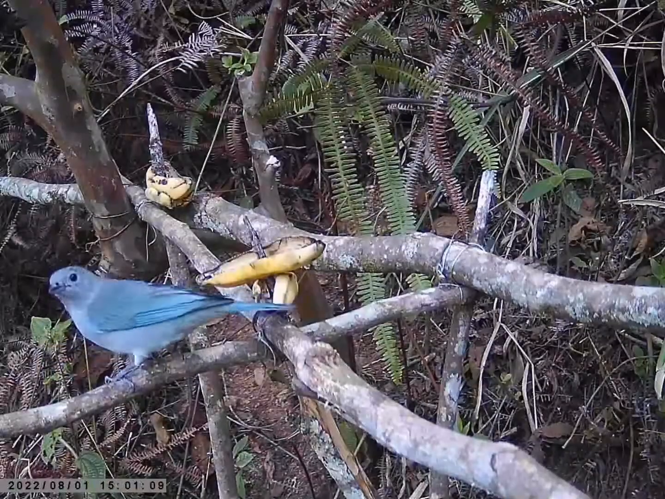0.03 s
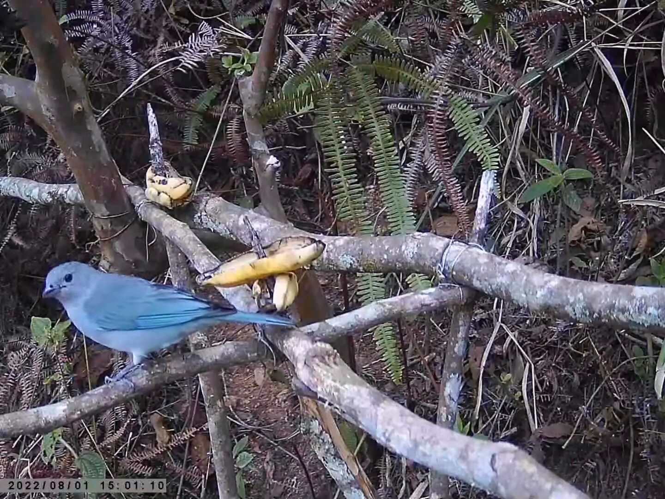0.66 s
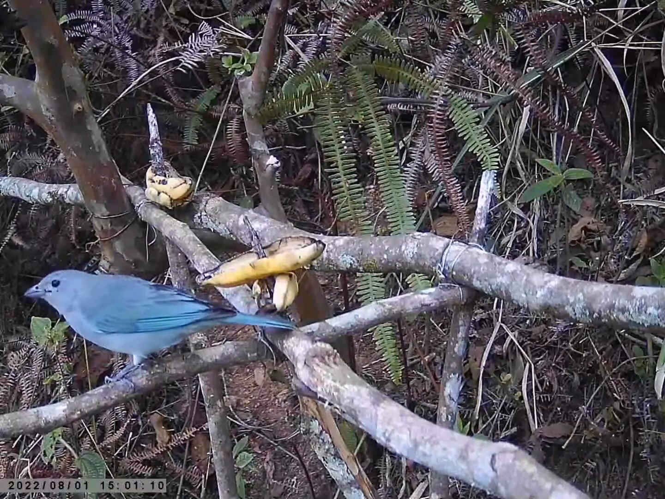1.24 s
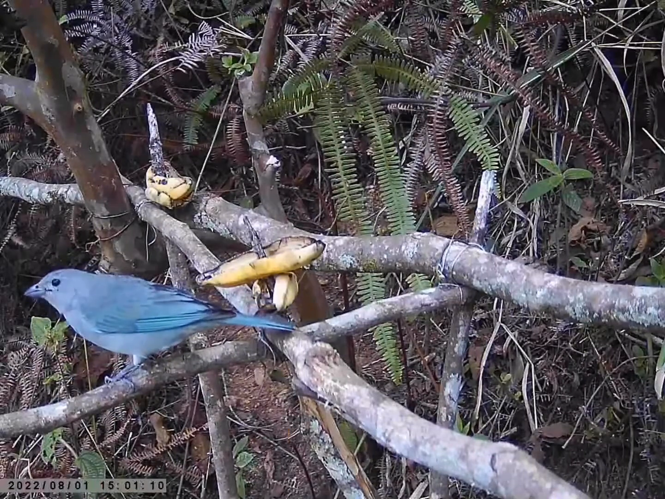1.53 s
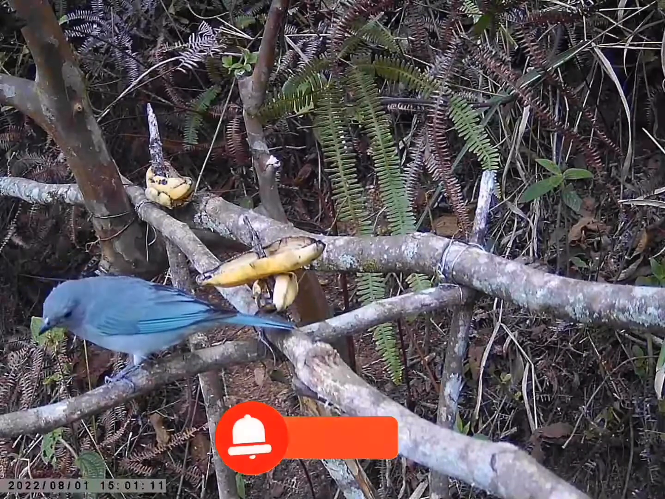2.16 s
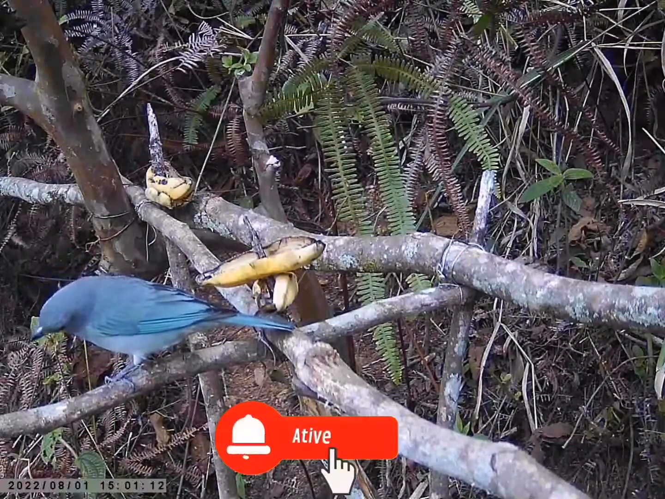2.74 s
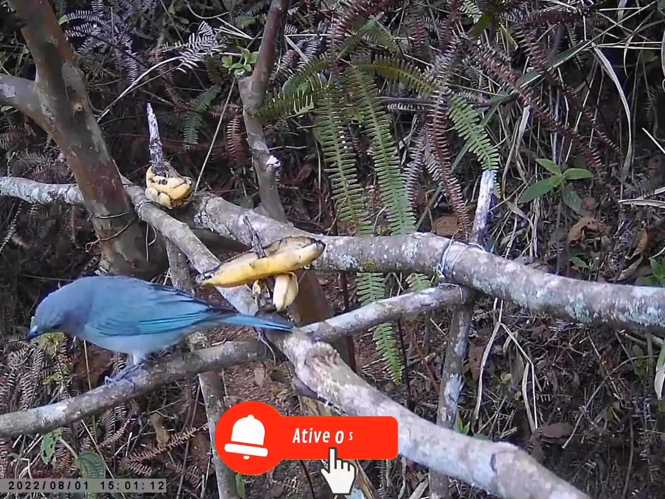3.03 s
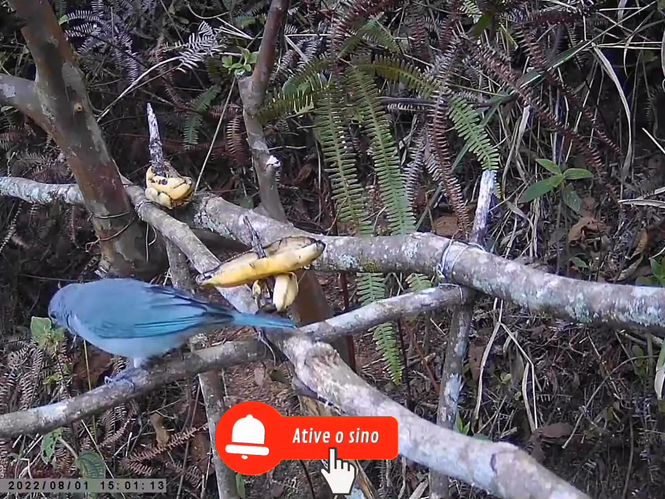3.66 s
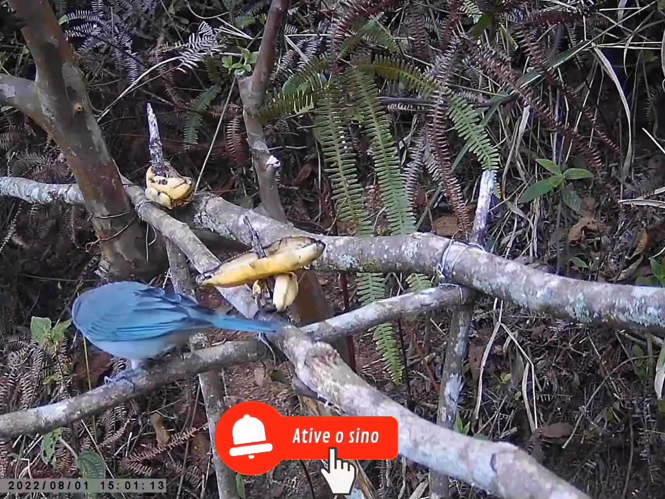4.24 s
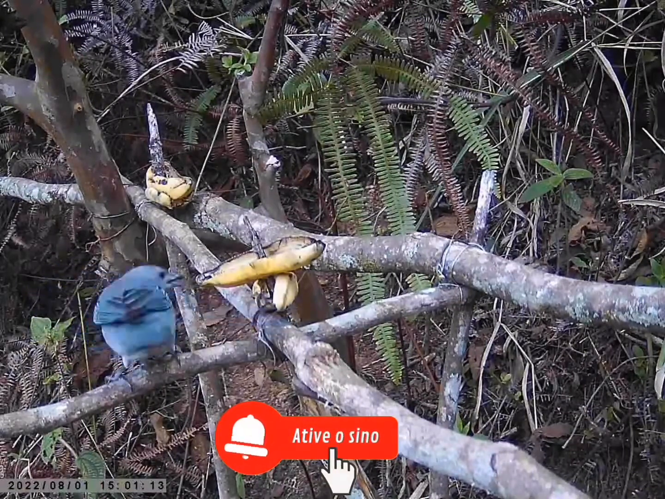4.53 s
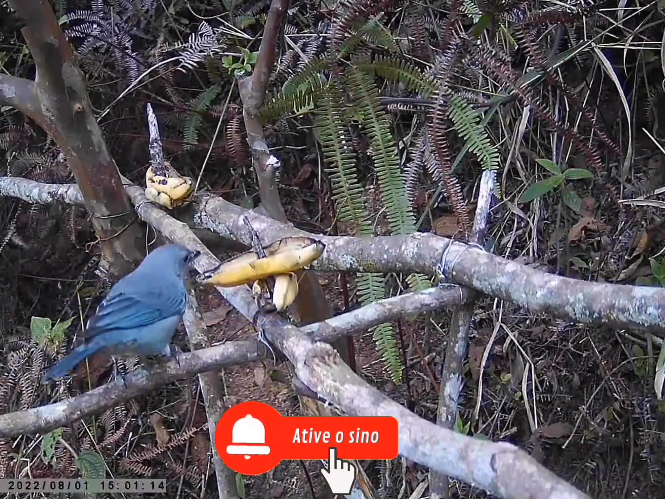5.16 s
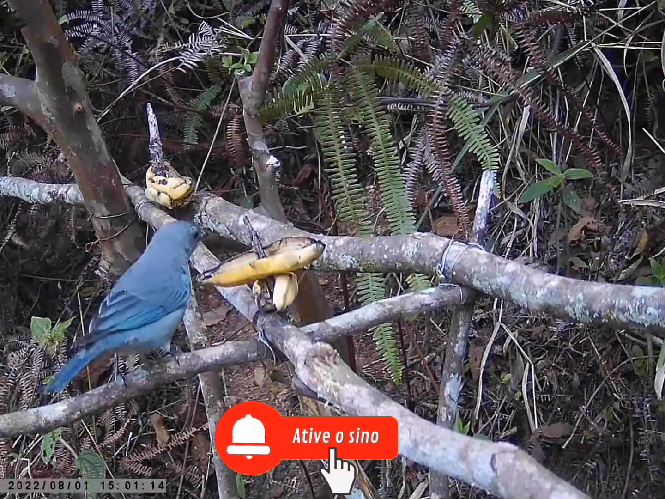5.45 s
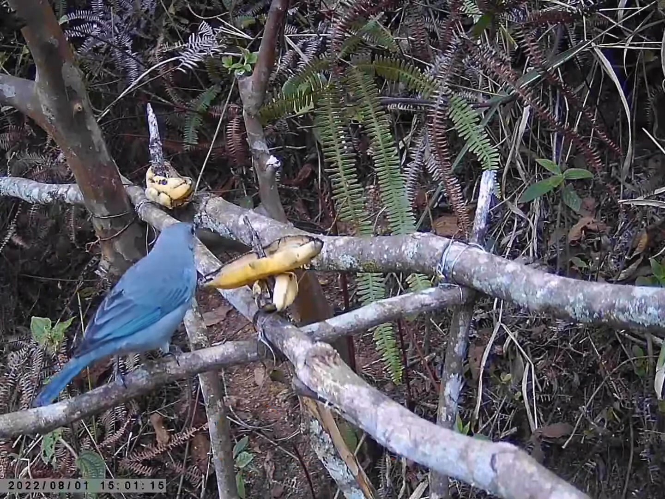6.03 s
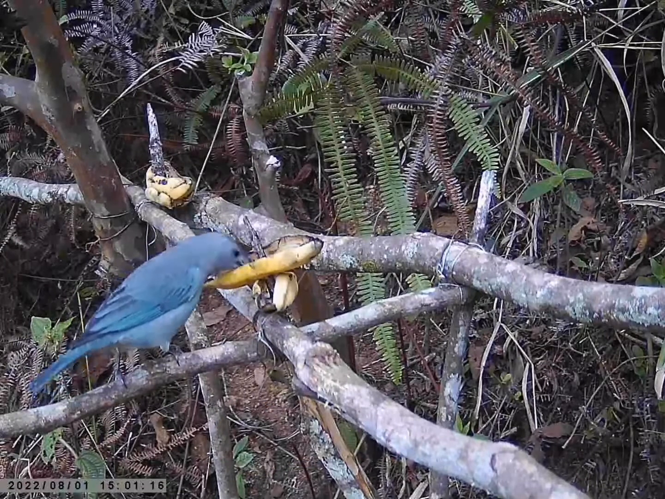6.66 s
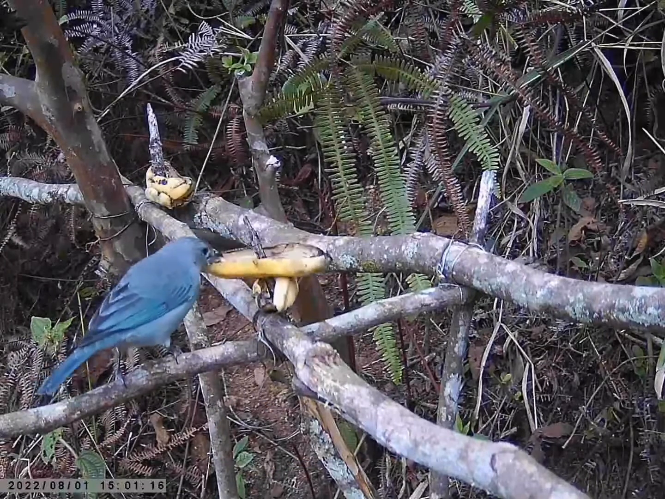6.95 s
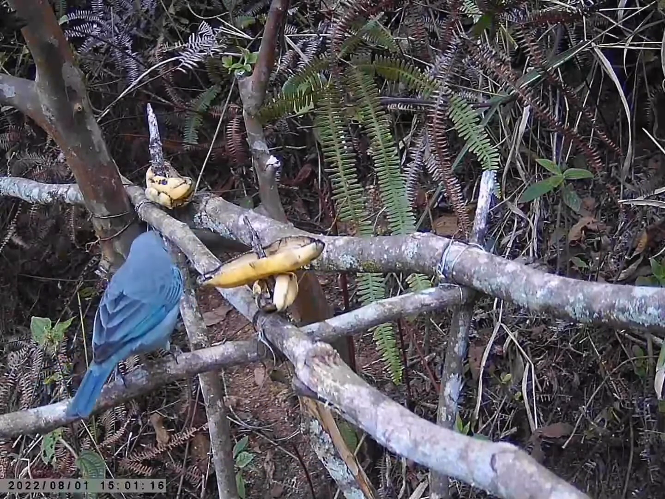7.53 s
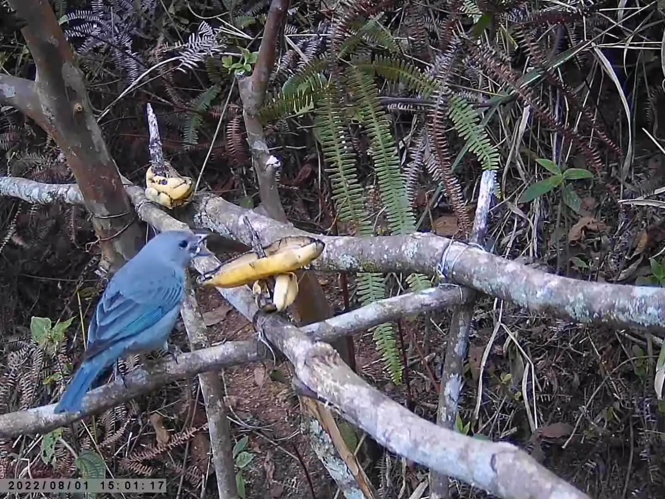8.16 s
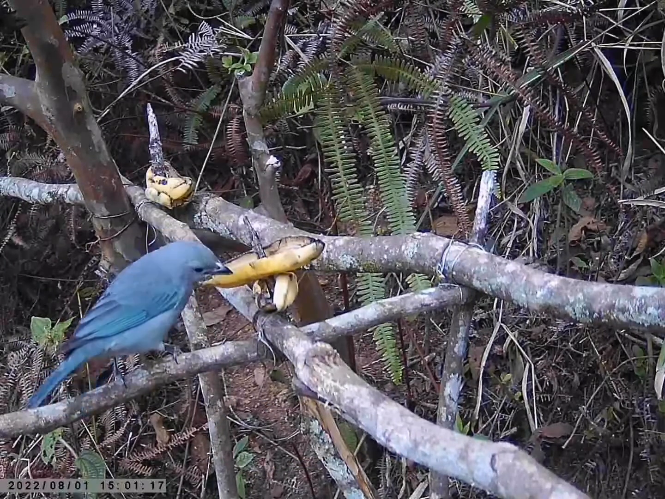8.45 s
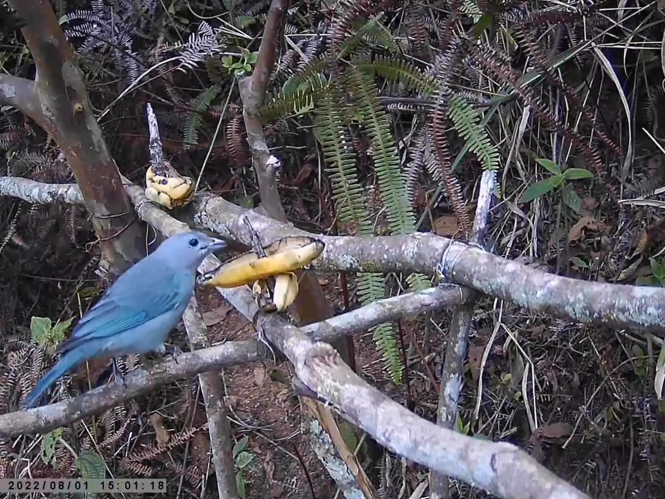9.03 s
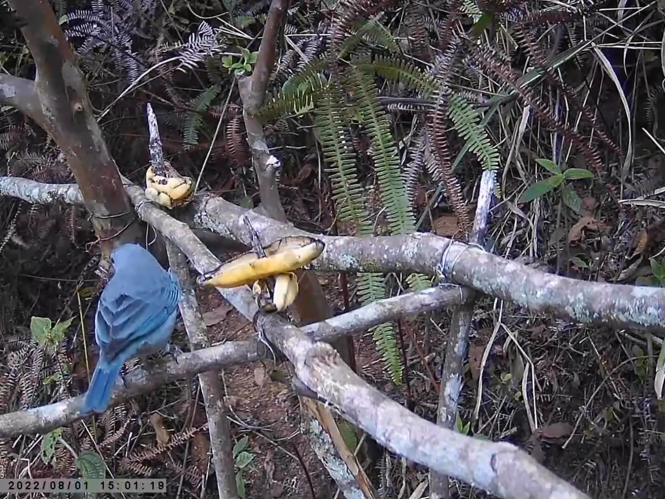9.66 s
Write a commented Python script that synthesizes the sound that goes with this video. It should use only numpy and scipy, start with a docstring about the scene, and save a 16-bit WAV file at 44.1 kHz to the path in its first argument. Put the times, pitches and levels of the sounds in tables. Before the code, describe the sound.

A quiet forest garden has a low rumble and a distant engine that slowly rises in pitch and grows a little louder. A small nearby bird gives nine short, thin, very high rising chips, at about 0.8, 2, 3.8, 5, 6.3, 7.2, 7.7, 8.5 and 9.2 seconds, each with a slight echo. Other birds add faint falling notes, pips and whistles from the trees. A very soft high buzz comes twice a second, and a faint high insect tone enters around 4 seconds. Twigs or a beak tick lightly near 2.4 and 4.3 seconds and again near the end. At 8.3 seconds a brief wing flick passes the microphone. Then close wing flutters at about 8.7, 9.2 and 9.7 seconds hit it with low thumps of air and a light feather rustle, the loudest sounds of all.

```python
"""At a garden feeder by a forest, a small bird gives thin rising chips with both sides of its syrinx,
its voice box. Other birds answer from the echoing trees. A distant engine slowly gathers speed,
an insect holds a faint high tone, and a soft buzz comes twice a second. Twigs and beak tick now and then.
Near the end, wings flutter so close to the microphone that their air thumps on it."""
import sys
import numpy as np
from scipy import signal
from scipy.fft import rfft, irfft, next_fast_len
from scipy.io import wavfile
from scipy.ndimage import uniform_filter1d, map_coordinates

SR = 44100
rng = np.random.default_rng(int(sys.argv[2]) if len(sys.argv) > 2 else 0)


def put_to_file(sound):
    """Save the sound as 16-bit audio at rate SR, in the file named by the first command-line argument."""
    columns = np.atleast_2d(sound).T  # one column per channel
    safe = np.clip(columns, -1, 1)
    whole_steps = np.round(safe * 32767)
    wavfile.write(sys.argv[1], SR, whole_steps.astype(np.int16))


N = 431738
T = np.arange(N) / SR

# Levels are relative: the functions turn them up or down in the mix.
# tone colours of the noises, each (frequency [Hz], level [dB])
FOREST_COLOUR = [(180, -40), (300, -5), (400, -4), (500, -3.5), (700, -7.5), (1900, -15), (3000, -16.5),
                 (4300, -18.5), (5000, -12.5), (5800, -10), (7500, -18.5), (9200, -21), (14300, -20),
                 (15700, -27)]  # leaves and far insects
RUMBLE_COLOUR = [(10, 4), (25, 3), (50, -0.5), (100, -9.5), (160, -15.5), (230, -20.5), (320, -24),
                 (600, -41), (1500, -72)]  # low background rumble
ROAD_COLOUR = [(60, -26), (150, -3.5), (300, 8), (650, -1), (1150, 0), (1700, -8), (3000, -16), (4500, -20),
               (9000, -26)]  # rush of the road
BUZZ_COLOUR = [(3000, -30), (4600, -4.5), (7000, -16), (8850, -8), (9100, 2.5), (9450, -7.5), (9700, -8),
               (12000, -14.5), (15000, -14.5)]  # soft high buzz
BUZZ_TICK_COLOUR = [(3500, -30), (4700, 1), (6000, -6), (9000, -12), (15000, -13)]  # tick that starts each buzz
SWIRL_COLOUR = [(12, -2), (30, 17), (60, -7), (110, -20), (165, -3), (220, -12.5), (290, -25), (450, -61.5),
                (1000, -79)]  # air swirling off the wings
FEATHER_COLOUR = [(100, -6.5), (350, 1), (700, -10), (1300, -10.5), (2500, -20.5), (6000, -22.5),
                  (15000, -38)]  # rustling feathers
# how long the forest echoes (frequency [Hz], time to fade by 60 dB [s])
ECHO_TIMES = [(300, 0.51), (3000, 0.15), (7500, 0.66), (14000, 0.52)]

# how fast the engine fires (time [s], rate [Hz])
FIRING_RATE = [(0, 63), (1.3, 64.38), (4, 70.3), (7.5, 77.35), (9.79, 78.08)]
# how strongly its lowest tone carries (time [s], level [dB])
EXHAUST_LEVEL = [(0, -54.5), (.9, -72), (1.5, -61), (2.8, -58), (3.3, -55), (4.8, -67), (5.5, -48),
                 (6.4, -50.5), (6.85, -56), (7.15, -45), (8.25, -61), (8.57, -42.5), (8.7, -47.5),
                 (9.79, -48)]
# resonances of pipe and hillside that shape its overtones (frequency [Hz], level [dB])
PIPE_RESONANCES = [(125, -66), (143, -66), (153, -65), (165, -71), (190, -68), (222, -69), (238, -78),
                   (280, -74), (305, -79), (360, -88), (420, -85), (442, -73), (465, -85)]
# the road's rush as the vehicle nears (time [s], level [dB])
ROAD_LEVEL = [(0, -77.5), (4, -75.5), (6.6, -68), (7.6, -63.5), (8.1, -66), (9.79, -65)]
# the insect's tone (time [s], level [dB], pitch [Hz])
INSECT_TONE = [(3.6, -102, 5157), (4.4, -82, 5150), (5, -81, 5180), (5.6, -79.5, 5262), (8, -78, 5404),
               (9.79, -73.5, 5230)]

# a far bird's calls and a nearer bird's falling notes, each (time [s], length [s], level [dB])
DISTANT_CALLS = [(3.669, 0.217, -69), (7.002, .2, -68), (9.519, 0.112, -63.5)]
FALLING_NOTES = [(0.925, 0.027, -67), (1.292, 0.018, -73), (2.444, .04, -70), (2.99, 0.047, -79),
                 (4.643, .04, -74), (5.113, 0.039, -66), (8.978, 0.069, -69), (9.102, 0.037, -65.5)]
# the two voices of each of those birds (pitch ratio, level [dB])
DISTANT_VOICES = [(0.99, 2), (.795, -11)]
FALLING_VOICES = [(1, 1), (1.23, -5)]
# far whistles and tiny pips, each (time [s], length [s], base pitch [Hz], level [dB])
WHISTLE_NOTES = [(0.2, .32, 3020, -79), (7.453, .32, 3130, -79)]
PIP_NOTES = [(2.27, .02, 8600, -71), (2.272, .018, 6740, -70), (2.785, .03, 7900, -76),
             (3.407, .016, 8950, -68), (5.275, .035, 7950, -72)]
# far hoots and a harsh squeak, each (time [s], length [s], start pitch [Hz], end pitch [Hz], level [dB])
HOOT_NOTES = [(8.32, 0.057, 740, 794, -67), (8.428, .052, 796, 763, -71)]
SQUEAK_NOTES = [(9.104, .052, 1477, 915, -62.5)]
# their harmonics, at 1, 2, ... times the pitch (level [dB])
HOOT_HARMONICS = [-4, -8]
SQUEAK_HARMONICS = [-20, 2.5, 3]

# snaps of twigs and beak (time [s], level [dB], knock above that level [dB])
PERCH_TICKS = [(2.386, -59, -10), (2.393, -60, -15), (4.293, -60, -15), (8.755, -64, -5), (9.195, -59, -3),
               (9.423, -62.5, 26.5), (9.430, -63, 21)]
# wings passing by (time [s], length [s], start level [dB], end level [dB])
WING_PASSES = [(8.29, 0.027, -35.5, -30), (8.72, .089, -30, -15.5), (9.155, .225, -17.5, -12),
               (9.666, 0.16, -14, -10)]
# the feeder bird's chips (time [s], length [s], low voice's top pitch [Hz], its last climb [Hz],
# high voice's top pitch [Hz], low voice's level [dB], high voice's level [dB])
FEEDER_CHIPS = [(0.782, .032, 7530, 152, 9950, -32.5, -51), (1.963, .031, 7800, 1040, 10150, -36, -51),
                (3.752, .034, 7640, 440, 10480, -37.5, -55), (5.011, 0.027, 7720, 350, 10060, -33, -51),
                (6.311, 0.029, 7620, 290, 9750, -37, -51), (7.161, 0.035, 7500, 724, 9120, -39, -48),
                (7.659, 0.035, 7340, 760, 9670, -39.5, -50), (8.544, 0.037, 7770, 1240, 9320, -41, -51),
                (9.223, .047, 7730, 500, 9680, -37, -58)]


def amp(db):
    """Turn decibels into a gain to multiply by."""
    return 10 ** (np.asarray(db) / 20)


def unit(x):
    """Scale x to an average strength (rms) of 1."""
    return x / np.sqrt(np.mean(x ** 2) + 1e-20)


def along(points, hz):
    """Read a (frequency, value) table at hz, on a log frequency scale."""
    freqs, values = np.transpose(points)
    return np.interp(np.log(hz + 1), np.log(freqs + 1), values)


def curves(rows):
    """Give one value per sample for each column after the time."""
    times, *columns = np.transpose(rows)
    return [np.interp(T, times, column) for column in columns]


def wobble(rate, size=N):
    """A smooth curve through `rate` random points a second."""
    points = rng.standard_normal(int(size * rate / SR) + 4)
    steps = np.linspace(0, len(points) - 1, 8 * len(points))
    return np.interp(np.arange(size) * rate / SR, steps, map_coordinates(points, [steps]))


def filtered(x, response):
    """Multiply each frequency in x by response(hz)."""
    size = next_fast_len(N + SR)
    return irfft(rfft(x, size) * response(np.fft.rfftfreq(size, 1 / SR)), size)[:N]


def coloured(x, colour):
    """Give x a tone colour."""
    return filtered(x, lambda hz: amp(along(colour, hz)))


def hiss(colour):
    """Even noise with a tone colour."""
    return unit(coloured(rng.standard_normal(N), colour))


def rush(colour, patchy_db):
    """Coloured noise with random louder and softer patches."""
    spectra = signal.stft(rng.standard_normal(N), nperseg=512)[2]
    patches = uniform_filter1d(rng.standard_normal(spectra.shape), size=6, axis=0)
    patches = uniform_filter1d(patches, size=14, axis=1)
    noise = signal.istft(spectra * amp(patchy_db * unit(patches)), nperseg=512)[1][:N]
    return unit(coloured(noise, colour))


def add(track, start, sound):
    """Mix a sound into the track at `start` seconds."""
    part = track[max(round(start * SR), 0):][:len(sound)]
    part += sound[:len(part)]


def phase(hz):
    """The growing angle of a wave that follows a pitch curve."""
    return 2 * np.pi * np.cumsum(hz) / SR


def swell(progress, crest, steep):
    """A rise and fall in loudness as progress goes from 0 to 1, peaking at crest."""
    angle = np.interp(progress, [0, crest, 1], [0, np.pi / 2, np.pi])
    return unit(np.sin(angle) ** steep)


def notes(rows, voices, hoarse_db, waver):
    """Whistled notes that glide and level out; rows are laid out like HOOT_NOTES."""
    out = np.zeros(N)
    for start, length, start_hz, end_hz, db in rows:
        progress = np.linspace(0, 1, int(length * SR))
        hz = end_hz + (start_hz - end_hz) * (1 - progress) ** 1.6
        angle = phase(hz * (1 + waver * wobble(260, len(hz))))
        gain = amp(db + hoarse_db * wobble(350, len(hz))) * swell(progress, crest=0.62, steep=0.7)
        add(out, start, gain * sum(amp(level) * np.sin(ratio * angle) for ratio, level in voices))
    return out


def tree_echo(x, early_db, early_s, tail_db):
    """Near branches scatter a quick cluster of echoes; the forest adds a longer tail."""
    hz, t, spectra = signal.stft(rng.standard_normal(SR // 2), SR, nperseg=256)
    fade = amp(-60 * t / along(ECHO_TIMES, hz)[:, None])
    tail = signal.istft(spectra * fade, SR, nperseg=256)[1]
    lag = np.arange(len(tail)) / SR
    early = rng.standard_normal(len(tail)) * amp(-60 * lag / early_s) * (lag > .004)
    echo = amp(early_db) * early / np.linalg.norm(early) + amp(tail_db) * tail / np.linalg.norm(tail)
    return signal.oaconvolve(x, echo)[:N]


def forest_air():
    """Still leaves and far insects make a faint haze over a low rumble."""
    haze = amp(-71) * rush(FOREST_COLOUR, patchy_db=1.5)
    return haze + amp(-56 + 1.5 * wobble(6.5)) * rush(RUMBLE_COLOUR, patchy_db=2.5)


def engine():
    """A far exhaust drones at its firing rate and overtones, over the rumble and rush of the road."""
    rate_hz, = curves(FIRING_RATE)
    exhaust_db, = curves(EXHAUST_LEVEL)
    road_db, = curves(ROAD_LEVEL)
    # overtones and rumble partly follow the lowest tone's swings, and grow as the vehicle nears
    usual_db = -56
    swing_db = exhaust_db - usual_db
    near_db = 0.49 * (road_db - road_db.mean())
    overtones_db = 1 + near_db + 0.14 * swing_db
    firing = phase(rate_hz * (1 + 0.0025 * wobble(9)))
    drone = amp(exhaust_db) * np.sin(firing)
    for harmonic in range(2, 7):
        db = along(PIPE_RESONANCES, harmonic * rate_hz) + overtones_db + 2.25 * wobble(7)
        drone += amp(db) * np.sin(harmonic * firing + 0.8 * wobble(11))
    rumble = rush([(40, -23.5), (90, -2), (140, -5.5), (220, -9.5), (500, -35), (1500, -78)], patchy_db=3)
    road = amp(road_db + 0.77 * wobble(7.6)) * rush(ROAD_COLOUR, patchy_db=1.43)
    return drone + amp(-68 + near_db + 0.4 * swing_db) * rumble + road


def insect(pulse_hz=26.6):
    """A thin pulsing tone, partly scattered by the leaves."""
    db, hz = curves(INSECT_TONE)
    pulses = unit(1 + 0.8 * np.sin(phase(pulse_hz * (1 + .008 * wobble(2.8)))))
    scattered = hiss([(4850, -30), (5130, -4.5), (5300, -8.5), (5450, -9), (5750, -40)])
    tone = np.sin(phase(hz * (1 + 0.0056 * wobble(120))))
    return amp(db) * pulses * (amp(0.5) * tone + amp(-5) * scattered)


def buzz(first_s=.14, every_s=.5, length_s=.17, fade_db_per_s=1.15):
    """A soft high buzz switches on twice a second with a tiny tick, and slowly fades."""
    age = (T - first_s) % every_s
    switch = uniform_filter1d(1. * (age < length_s), size=400)
    tick = amp(11 - 60 * age / 0.032) * hiss(BUZZ_TICK_COLOUR)
    return amp(-75.5 - fade_db_per_s * T) * (switch * hiss(BUZZ_COLOUR) + tick)


def far_birds(call_start_hz=5320, call_end_hz=5390):
    """Calls, whistles and hoots from deep in the forest arrive with plenty of echo."""
    rows = [(start, length, call_start_hz, call_end_hz, db) for start, length, db in DISTANT_CALLS]
    calls = notes(rows, DISTANT_VOICES, hoarse_db=3.5, waver=0.0226)
    rows = [(start, length, hz, hz, db) for start, length, hz, db in WHISTLE_NOTES]
    whistles = notes(rows, [(0.98, 0)], hoarse_db=5, waver=0.01)
    hoots = notes(HOOT_NOTES, list(enumerate(HOOT_HARMONICS, 1)), hoarse_db=4.5, waver=.01)
    direct = amp(-7.5) * calls + amp(-4.5) * whistles + amp(2) * hoots
    echo = tree_echo(calls + whistles + amp(-1) * hoots, early_db=-10.5, early_s=.07, tail_db=-0.5)
    return direct + echo


def nearby_birds(fall_start_hz=8600, fall_end_hz=6500):
    """Birds in the nearby trees give falling notes, pips and one harsh squeak."""
    rows = [(start, length, fall_start_hz, fall_end_hz, db) for start, length, db in FALLING_NOTES]
    falls = notes(rows, FALLING_VOICES, hoarse_db=1.5, waver=0.028)
    rows = [(start, length, hz, hz, db) for start, length, hz, db in PIP_NOTES]
    pips = notes(rows, [(0.98, 0)], hoarse_db=0, waver=0.01)
    squeak = notes(SQUEAK_NOTES, list(enumerate(SQUEAK_HARMONICS, 1)), hoarse_db=3.5, waver=0.015)
    echo = tree_echo(falls, early_db=-4, early_s=0.055, tail_db=1)
    echo += tree_echo(pips + squeak, early_db=-10, early_s=.1, tail_db=-7)
    return amp(1) * (falls + pips + squeak) + echo


def perch_ticks():
    """Twigs and beak make dry little snaps on the perch; the harder ones knock the wood."""
    snaps, knocks = np.zeros(N), np.zeros(N)
    t = np.arange(SR // 20) / SR
    for start, db, knock_db in PERCH_TICKS:
        add(snaps, start, amp(db + 3 - 60 * t / 0.023) * rng.standard_normal(len(t)))
        add(knocks, start, amp(db + knock_db - 60 * t / 0.016))
    return knocks + coloured(snaps, [(200, -1), (1500, -6.5), (7000, 6), (14000, -15)])


def wings(strokes_per_s=74.5, puff_s=0.0151, upstroke_db=-5.5, flicks_per_s=360):
    """Each stroke, up or down, sucks a puff of air off the microphone; air swirls and feathers rustle."""
    puffs = np.zeros(N)
    puff = np.hanning(int(puff_s * SR)) ** 1.51
    for start, length, start_db, end_db in WING_PASSES:
        times = np.arange(0, length, 1 / strokes_per_s)
        for stroke, when in enumerate(times):
            late, gust = rng.standard_normal(2)
            nearing_db = start_db + (end_db - start_db) * when / length
            db = nearing_db + 2.8 * gust + upstroke_db * (stroke % 2)
            add(puffs, start + when + 0.001 * late - puff_s / 2, -amp(db) * puff)
    airflow = np.abs(uniform_filter1d(puffs, size=600))
    swirls = amp(-10) * airflow * hiss(SWIRL_COLOUR)
    rustle = amp(-50 + 4.2 * wobble(150)) * hiss(FEATHER_COLOUR)
    # feather edges flick past each other, and each flick dies away quickly
    flicks = (rng.random(N) < flicks_per_s / SR) * rng.standard_normal(N)
    flicks = signal.lfilter([1], [1, -np.exp(-1 / (0.00033 * SR))], flicks)
    crackle = amp(-48.5) * flicks * hiss([(500, 7), (3000, -7), (15000, -6)])
    leak_hz, damping = 3.5, 1.1  # the pressure leaks back slowly and overshoots
    thumps = filtered(puffs, lambda hz: -hz ** 2 / (leak_hz ** 2 - hz ** 2 + 1j * damping * leak_hz * hz))
    return thumps + swirls + np.sqrt(airflow) * (rustle + crackle)


def syrinx_side(t, top_hz, climb_hz, leap_hz, waver, leap_s=0.004):
    """The phase of one voice: its pitch leaps up, then climbs gently with a slight quiver."""
    climb = np.interp(t / t[-1], [.35, .75], [top_hz - climb_hz, top_hz])
    hz = climb - leap_hz * np.exp(-t / leap_s)
    return phase(hz * (1 + waver * wobble(900, len(t))))


def feeder_bird():
    """Both sides of the voice box sing a rising chip; acting on each other, they add a weak extra tone."""
    chips = np.zeros(N)
    for start, length, low_hz, climb_hz, high_hz, low_db, high_db in FEEDER_CHIPS:
        t = np.arange(int(length * SR)) / SR
        low = syrinx_side(t, low_hz, climb_hz, leap_hz=5305, waver=.011)
        high = syrinx_side(t, high_hz, climb_hz=152, leap_hz=4000, waver=.014)
        low_gain = amp(low_db - 7.5) * swell(t / length, crest=0.62, steep=2.03)
        high_gain = amp(high_db) * swell(t / length, crest=0.59, steep=0.54)
        overtone = amp(-30) * np.sin(2 * low)
        extra_tone = amp(-32) * np.sin(2 * high - low)
        rasp = amp(-16) * rng.standard_normal(len(t))
        add(chips, start, low_gain * (np.sin(low) + overtone + extra_tone))
        add(chips, start, high_gain * (np.sin(high) + rasp))
    return amp(0.5) * chips + tree_echo(chips, early_db=-3.5, early_s=0.1, tail_db=-19)


def scene():
    """Mix the birds and the steady background into one channel."""
    birds = feeder_bird() + nearby_birds() + far_birds() + perch_ticks() + wings()
    return (birds + engine() + insect() + buzz() + forest_air())[None]


def record(dry, top_hz=15750):
    """Cut off the treble above top_hz."""
    padded = np.pad(dry[0], (0, SR // 10), mode="edge")
    return filtered(padded, lambda hz: hz < top_hz)[None]


dry = scene()
out = record(dry)
put_to_file(out)
```